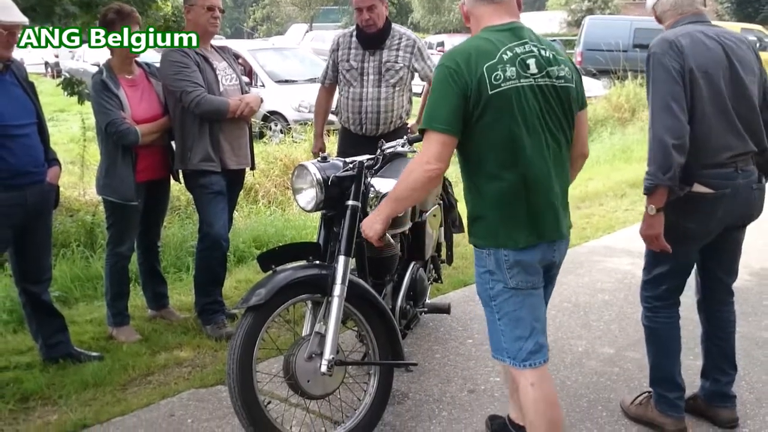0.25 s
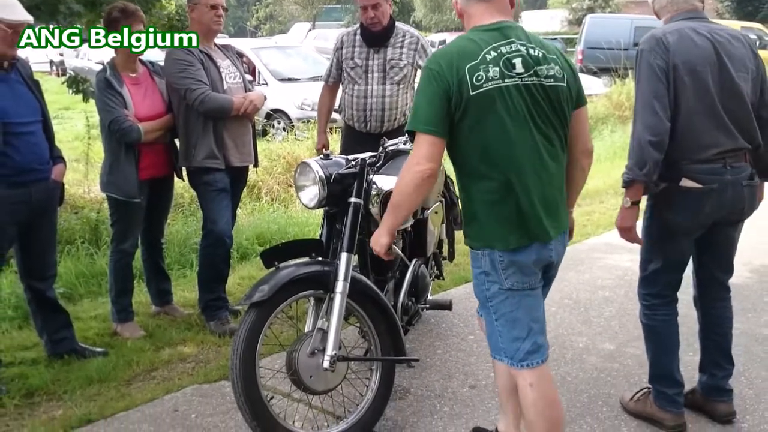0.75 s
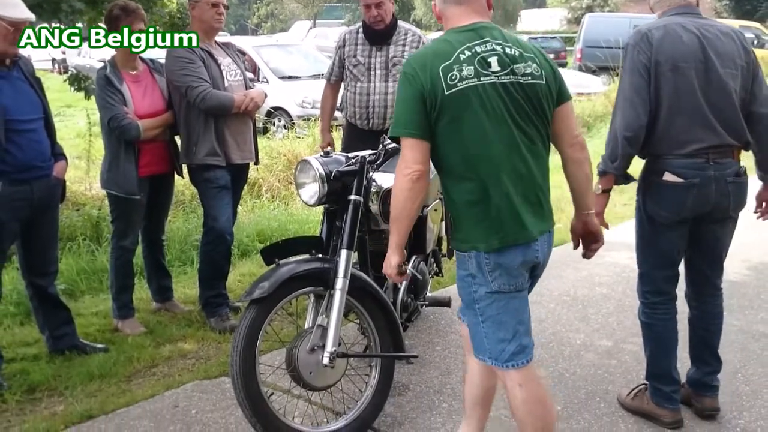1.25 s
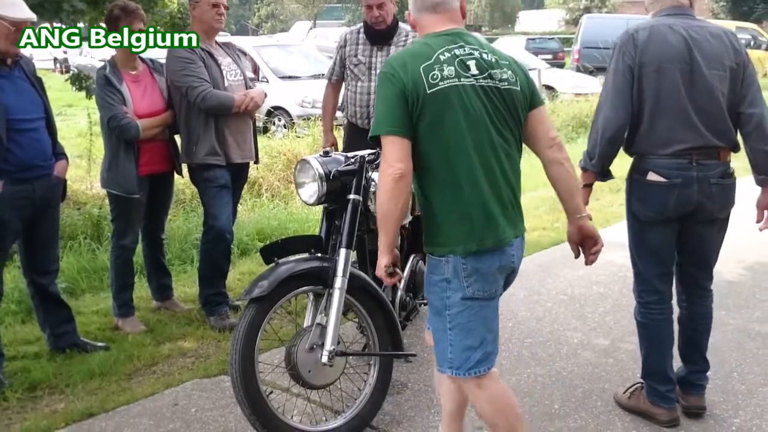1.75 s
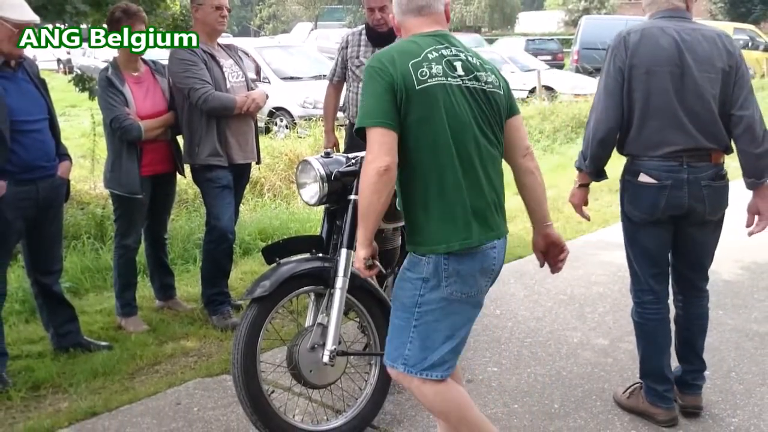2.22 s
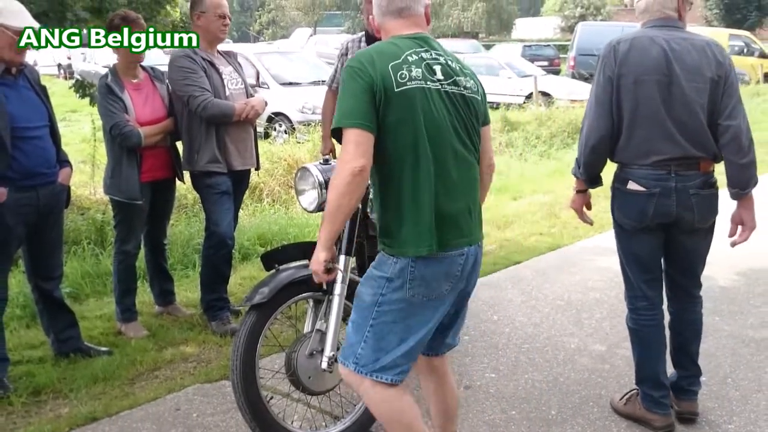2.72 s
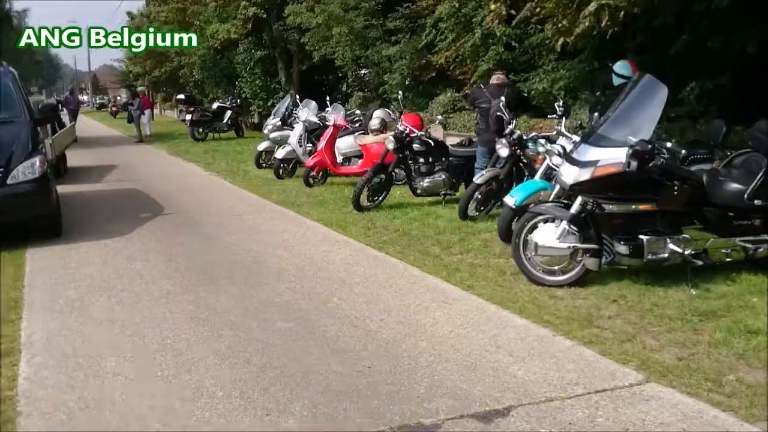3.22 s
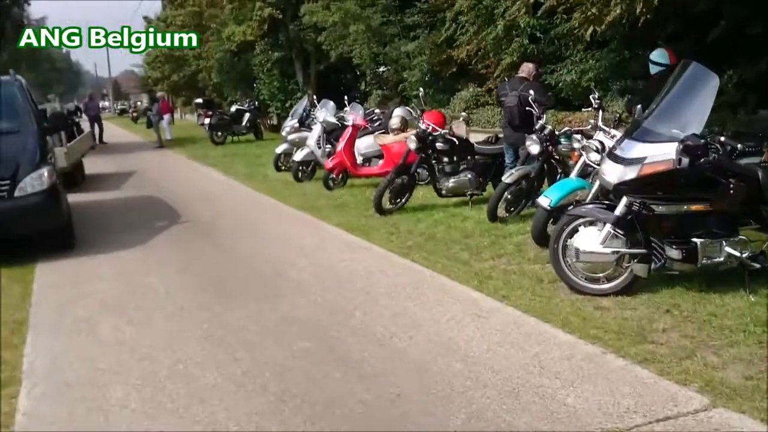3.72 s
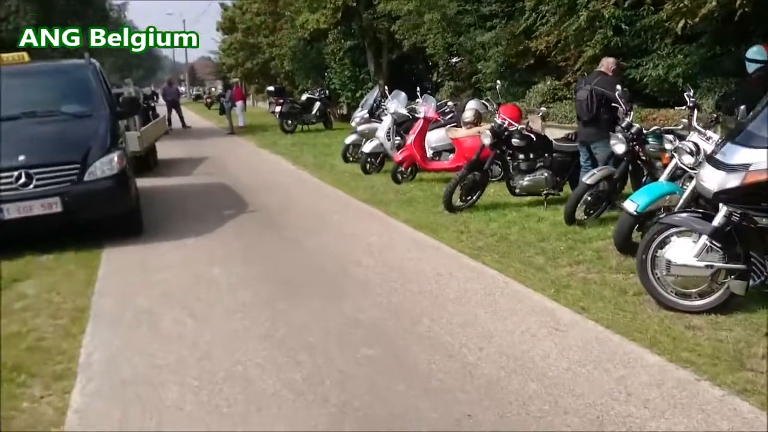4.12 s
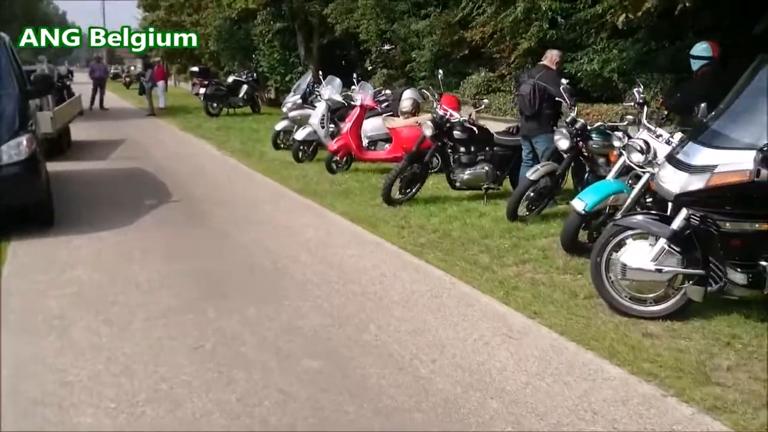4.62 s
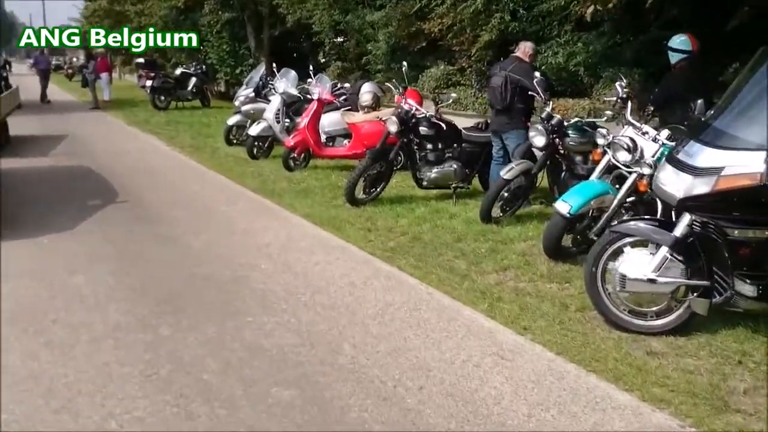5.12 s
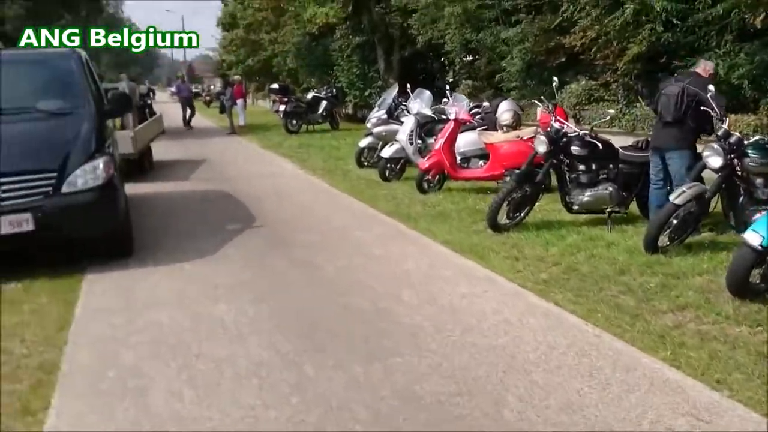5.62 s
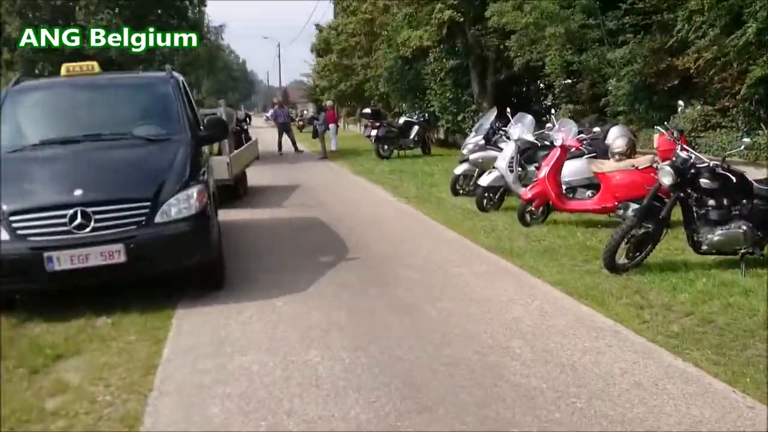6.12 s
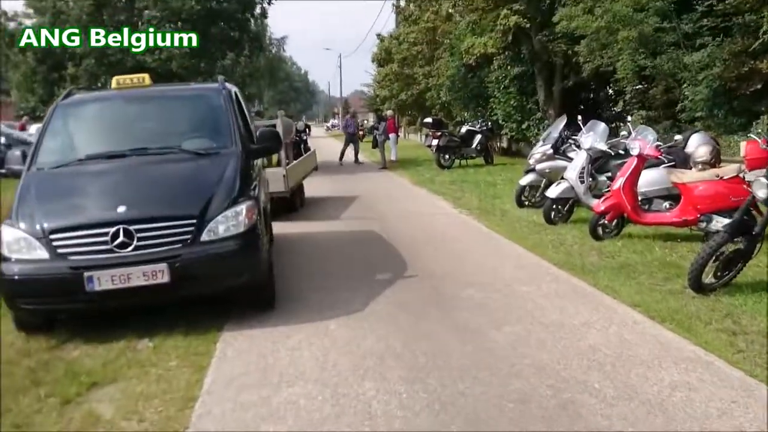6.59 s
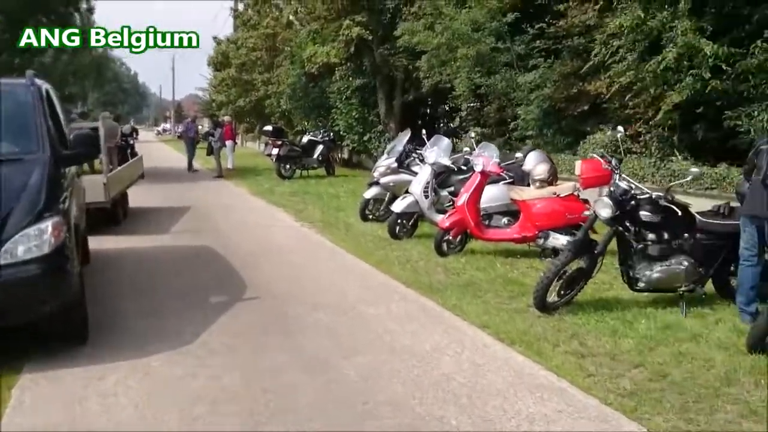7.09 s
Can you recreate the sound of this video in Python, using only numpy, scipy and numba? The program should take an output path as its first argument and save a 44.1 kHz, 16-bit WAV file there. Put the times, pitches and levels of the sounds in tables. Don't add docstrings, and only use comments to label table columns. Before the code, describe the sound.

Close outdoors, an old twin-cylinder motorcycle falls back from a rev, booming and hissing with ringing exhaust pops, while a single thumps slowly beside it. The twin then barks under load and pulls away. A brief fading idle leads to silence. A quiet lane fades in with far engine hum, leaves, wind puffs mainly on the right microphone and small scuffs, ending in a hard knock on the camera.

```python
import sys
import numpy as np
from scipy import signal
from scipy.fft import rfft, irfft
from scipy.io import wavfile
from scipy.ndimage import uniform_filter1d
from numba import njit

SR = 44100
rng = np.random.default_rng(int(sys.argv[2]) if len(sys.argv) > 2 else 0)


def materialize(psi):
    bounded = np.clip(np.atleast_2d(psi).T, -1, 1)
    quanta = np.round(bounded * 32767).astype(np.int16)
    wavfile.write(sys.argv[1], SR, quanta)


def ratio(d):
    e = np.asarray(d, float) / 20
    return 10 ** e


N = 324135
T = np.arange(N) / SR

# t/s, firing f/Hz, second-order boom level/dB
TWIN_OVERRUN = [(0, 56.55, -6.5), (.29, 54.07, -6.5), (.484, 52, -10.5), (.7, 49.2, -9.5),
                (.76, 49.07, -15), (.85, 48.88, -14.5), (1.05, 48.4, -20), (1.23, 45.27, -26.5),
                (1.45, 44.25, -25)]


def twin_turn():
    return 2 * np.pi * np.cumsum(curves(TWIN_OVERRUN)[0]) / SR


# multiple, level under the second order/dB
BOOM_ORDERS = [(.5, -22), (1.5, -12.5), (2.5, -14.5), (3.5, -21.5), (4, -21.5)]
# t/s, peak level/dB, ring f/Hz, ring level/dB
POPS = [
    (0.204, -13.5, 436, -36),
    (0.391, -19, 420, -33),
    (.588, -8.5, 580, -12.5),
    (.934, -12, 443, -17),
    (1.125, -11.5, 458.8, -19),
    (1.369, -8.5, 420, -28),
    (1.392, -14, 437.6, -20),
]
# f/Hz, width/Hz, level/dB
POP_PIPE = [(179, 230, -4), (326, 170, -1), (90, 50, -1.5)]


def overrun(turn):
    two_db = curves(TWIN_OVERRUN)[1]
    fall_db = 0.33 * (two_db - two_db[0])
    one_db = -20.5 + fall_db + 3 * walk(14)
    three_db = -24.5 + fall_db + 3 * walk(14)
    orders = [(1, one_db), (2, two_db), (3, three_db)] + [(k, two_db + db) for k, db in BOOM_ORDERS]
    boom = 0
    for k, db in orders:
        boom = boom + np.sqrt(2) * ratio(db + 1.1 * walk(25)) * np.sin(k * turn + 0.61 * walk(30))

    half_turns = np.flatnonzero(np.diff(turn // np.pi)) / SR
    chance = rng.standard_normal((len(half_turns), 2))
    weak_clicks = pulses(half_turns + .0015 * chance[:, 0], 5.1 * chance[:, 1])
    uneven = ring(soften(weak_clicks, 0.67), POP_PIPE)
    uneven_gain = ratio(-23 + fall_db + 1.5 * walk(9.1))
    steady = boom + uneven_gain * uneven / uneven.std()
    return steady * between(-1, 1.46, edge=0.044) + late_pops()


def late_pops():
    pops = 0
    for s, db, ring_hz, ring_db in POPS:
        modes = [(f, w, g + db + 3.0) for f, w, g in POP_PIPE] + [(ring_hz, 70, ring_db + 4.5)]
        pops = pops + ring(-soften(pulses([s], 0), 0.19), modes)
    s, db = np.transpose(POPS)[:2]
    gas_colour = [(300, 0), (1500, -11.5), (3000, -10.5), (8000, -15.5)]
    return pops + puff(pulses(s, db - 17.0), 0.88, 5.4) * noise(gas_colour)


# t/s, how far it has gone/0-1
PULL_AWAY = [(1.46, 0.03), (1.6, 0.06), (2.0, 0.37), (2.35, 0.5), (2.6, 0.7), (2.76, 1)]
# t/s, firing f/Hz
PULL_REVS = [(1.44, 44.65), (1.62, 47.46), (2.0, 49.21), (2.76, 58.02)]
# f/Hz, width/Hz, level/dB
TWIN_PIPE = [(136.4, 18, 2), (91.1, 32, -1), (197.3, 31, -3)]
# first f/Hz, last f/Hz
SILENCER_GLIDES = [(420, 560), (870, 960), (990, 1130), (1290, 1410)]
# width/Hz, level/dB
SILENCER_RINGS = [(87.6, -5.5), (70.7, -8), (70, -8.5), (93, -24.5)]
# f/Hz, width/Hz, level/dB
VALVE_MODES = [(5300, 500, -2), (6120, 570, -2.5), (2680, 440, -5)]
# t/s, level/dB
RUMBLE = [(0, -38), (.7, -19), (2.0, -29), (2.5, -43)]


def pull_away():
    away = curves(PULL_AWAY)[0]
    # the gas rasp drops fastest, the deep boom next, the silencer ring least; levels in dB, the
    # road echo lag in ms
    layers = (-9.5, -18), (-11.5, -26), (-17, -20), (-32.5, -51), (2.5, 2.96)
    bark_db, boom_db, ring_db, rasp_db, echo_ms = (near + (far - near) * away for near, far in layers)
    hump = np.interp(away, [0.34, 1], [1.0, 0.19])
    span = (1.4612, 2.755)
    clicks = firings(span, PULL_REVS, .00025, 1.5)

    gas = soften(clicks, .15) + .035 * puff(clicks, 1.5, 11.0) * rng.standard_normal(N)
    silencer = 0
    for k, (hz, (width, db)) in enumerate(zip(SILENCER_GLIDES, SILENCER_RINGS)):
        gain = (-1) ** k * ratio(db) * SR / (2 * np.pi * width)
        silencer = silencer + gain * glide(gas, np.interp(T, span, hz), 1. * width)
    boom = ring(soften(clicks, 2.4), TWIN_PIPE)

    direct = ratio(bark_db) * bark(clicks, dip_ms=0.72, hump_ms=1.265, hump=hump)
    road = 0.37 * np.interp(T - echo_ms / 1000, T, direct)

    uneven = clicks * ratio(3.2 * walk(40))
    rasp_colour = [(400, -2.0), (1000, -0.5), (2500, -14.5), (5000, -6.5), (9000, -14.5), (15500, -19.5)]
    rasp = ratio(rasp_db + 3.5) * puff(uneven, 0.812, 4.0) * noise(rasp_colour)
    valve_clicks = np.roll(clicks * ratio(4.0 * walk(50)), int(0.0018 * SR))
    valves = ratio(bark_db - 24) * ring(valve_clicks, VALVE_MODES)
    rumble_colour = [(15, -14.5), (40, -3.5), (90, -2.5), (200, -13.0)]
    rumble = ratio(curves(RUMBLE)[0] + 2.0 * walk(10)) * noise(rumble_colour)
    return direct + road - ratio(ring_db) * silencer - ratio(boom_db) * boom + rasp + rumble + valves


# t/s, thump level/dB, pipe facing the camera/0-1
SINGLE_IDLE = [
    (.27, -42.5, 0.9),
    (.55, -13.5, 0),
    (1.05, -16, 0.24),
    (1.25, -10, 0.5),
    (1.45, -14, 0.76),
    (2.1, -18, 0.23),
    (2.75, -23.5, 0.07),
]
# t/s, firing f/Hz
SINGLE_REVS = [(.27, 16.34), (1.0, 16.22), (1.8, 17.82), (2.76, 19.46)]
# t/s, f/Hz
SINGLE_RING = [(.3, 520), (1.3, 530), (1.45, 660), (2.75, 680)]
# f/Hz, width/Hz, level/dB
SINGLE_PIPE = [(973, 51, -8), (1330, 150, -7), (271, 68, -2.5), (45.36, 26, -8.5)]


def single():
    thump_db, facing = curves(SINGLE_IDLE)
    crack_db = thump_db - 18 + 7.5 * facing
    clicks = firings((.2772, 2.75), SINGLE_REVS, .0004, 1.8)
    push = soften(clicks, .2)
    main = ratio(2.0) * SR / (2 * np.pi * 130) * glide(push, curves(SINGLE_RING)[0], 110.0)
    thump = 0.77 * bark(clicks, dip_ms=0.95, hump_ms=1.63, hump=0.48)
    knock = thump - main + ring(push, SINGLE_PIPE)
    crack_colour = [(500, 0.5), (1200, -2), (2500, -2), (5000, -8.5), (9000, -7.5), (15500, -19.0)]
    crack = puff(clicks, 0.69, 4.5) * noise(crack_colour)
    return ratio(thump_db) * knock + ratio(crack_db + 2.5) * crack


# t/s, level/dB
HISS = [(0, -14.5), (.07, -18.5), (.4, -25.5), (.77, -29), (1.15, -36.5), (1.5, -37), (2.2, -46),
        (2.6, -46), (2.75, -52)]
# f/Hz, level/dB
HISS_COLOUR = [(1500, -15), (2100, -4), (2800, -1.5), (3600, -5), (5000, -6.5), (7000, -9.5), (9000, -18.5)]


def hiss(turn):
    main_db = curves(HISS)[0]
    low_db = -8.5 + 0.64 * main_db
    top_db = -18.5 + .92 * main_db
    gate = 1 + 0.19 * np.sin(turn) * between(-1, 0.96, edge=0.9)
    low_colour = [(250, -8.5), (550, -3.5), (1100, -4), (1600, -9), (2200, -18.0)]
    top_colour = [(7000, -13.5), (9000, -5.5), (12000, -9.0), (15600, -14)]
    main = ratio(main_db - 4.0 + 1.1 * walk(40)) * noise(HISS_COLOUR)
    low = ratio(low_db - 5.0 + 2.0 * walk(30)) * noise(low_colour)
    top = ratio(top_db + 1.5 * walk(40)) * noise(top_colour)

    intake_hz = 930 + (1600 - 930) * np.exp(-np.maximum(T - 0.13, 0) / 0.3)
    intake_db = -24.5 - 26 * np.abs(T - 0.36)
    gear_hz = 2750 + 500 * T
    gear_db = -26 - 40.5 * np.maximum(T - 0.2, 0)
    breath = rng.standard_normal((3, N))
    intake = ratio(intake_db + 21.5) * glide(breath[0], intake_hz, 65.0)
    gear = ratio(gear_db + 14.0) * glide(breath[1], gear_hz, 199.6)
    wavering = ratio(main_db + 12.0) * glide(breath[2], 1570 + 30 * walk(6), 110.)
    whistles = (intake + wavering + gear) * between(-1, 1.1)
    return gate * (main + low + top + whistles) * between(-1, 2.758)


# t/s, peak level/dB
THUDS = [
    (2.754, -31),
    (2.786, -36),
    (2.835, -27),
    (2.873, -30),
    (2.922, -30.5),
    (2.956, -35.5),
    (3.005, -33),
    (3.042, -38.5),
    (3.092, -43),
]
# f/Hz, width/Hz, level/dB
THUD_PIPE = [(174, 24, 2.5), (67, 24, 3.5), (138, 25, -9), (970, 110, -6.5)]
# t/s, peak level/dB
TICKS = [
    (2.833, -42),
    (2.8844, -49),
    (2.9402, -52),
    (2.9934, -49),
    (3.0494, -59),
    (3.096, -59),
]


def slow_idle():
    s, db = np.transpose(THUDS)
    thuds = -ring(soften(pulses(s, db - 1.5), 0.5), THUD_PIPE)
    tick_colour = [(1200, -5), (2200, 7), (5000, -18.0), (9000, -16)]
    ticks = puff(pulses(*np.transpose(TICKS)), 0.27, 3.6) * ratio(-0.5) * noise(tick_colour)
    rumble_db = np.interp(T, [2.75, 2.9, 3.1], [-28, -38, -58])
    rumble = ratio(rumble_db) * noise([(4, -1), (12, -13), (30, -12.0), (260, -22.0), (340, -50.0)])
    air_db = np.interp(T, [2.75, 2.95, 3.11], [-54, -60, -76])
    air_colour = [(300, 4.5), (1000, -1.5), (2500, -2.5), (4000, -12.0), (6000, -18.0), (15500, -28.0)]
    air = ratio(air_db) * noise(air_colour)
    return (thuds + ticks + rumble + air) * between(2.752, 3.11)


# t/s, peak level/dB, f/Hz, width/Hz, left minus right/dB
KNOCKS = [
    (7.165, -26.5, 150, 200, -16),
    (7.201, -36, 150, 199, -8),
    (7.234, -16.5, 248, 500, -10),
    (7.2625, -33.5, 5740, 1500, -5.5),
    (7.2665, -5, 1876, 1371, 17.5),
    (7.267, -25.5, 4020, 150, 7.5),
    (7.268, -22.5, 8700, 7840, 12.5),
    (7.29, -31.5, 890, 900, 0.5),
    (7.2977, -17, 1400, 900, 19),
    (7.348, -22.5, 800, 1513, 1),
]


def camera_knocks():
    knocks = 0
    for s, db, hz, width, pan in KNOCKS:
        contact = np.sign(400 - hz) * soften(pulses([s], db), 120 / hz)
        knocks = knocks + np.outer(ratio([pan / 2, -pan / 2]), ring(contact, [(hz, width, 0)]))
    rub = puff(pulses([7.266, 7.292], [-33, -34]), 1.8, 13.0) + ratio(-40) * between(7.26, 7.4, edge=0.02)
    scrape_colour = [(60, 13.0), (300, 4), (1500, -4.5), (4000, -13.5), (15600, -22)]
    return knocks + rub * ratio(2.0 * walk(200)) * noise(scrape_colour)


# t/s, peak level/dB, f/Hz, left minus right/dB
TAPS = [
    (4.516, -31.5, 970, -2),
    (5.121, -38, 1510, -2),
    (5.146, -31, 720, 3),
    (5.696, -30, 626, 6),
    (5.753, -28, 920, -1),
    (6.325, -32, 891, 0),
    (6.645, -36, 1250, -4),
    (7.059, -28.5, 705, -1),
]


def far_steps():
    steps = 0
    for s, db, hz, pan in TAPS:
        scuff = puff(pulses([s - .002], db - 7.0), 1.4, 10.0)
        colour = [(hz / 2.0, -15), (hz, 0), (2.02 * hz, -12)]
        steps = steps + ratio([[pan / 2], [-pan / 2]]) * scuff * noise(colour)
    return steps


# t/s, level under full/dB
FADE_IN = [(3.78, -49), (3.84, -35), (4.1, -12.5), (4.28, -4), (4.5, 0)]
# f/Hz, level per Hz/dB
AIR = [(15, -46.5), (25, 2.5), (66, -10), (470, -26), (1300, -28), (2560, -33.5), (5200, -49.5),
       (15500, -74)]
# f/Hz, width/Hz, level/dB
LEAVES = [(639, 90, -3), (852, 170, 4), (1367, 130, 1.5), (1680, 70, -12), (2540, 190, -0.5),
          (3254, 110, -8), (3583, 67, -11.5), (4300, 260, -31), (5680, 140, -17.5)]
# f/Hz, level/dB
RUSTLE_COLOUR = [(2500, -11), (3800, -3.5), (5000, -3.5), (7000, -8), (10000, -15), (15500, -15.5)]
# t/s, length/s, level/dB
RUSTLES = [
    (4.16, 0.087, -45.5),
    (4.3, 0.12, -44),
    (5.16, 0.067, -57),
    (5.33, .06, -50.5),
    (6.06, 0.17, -52),
    (7.21, 0.042, -63),
]
# multiple, level/dB
HUM_ORDERS = [(1, -11), (2, 1.5), (3, -2), (4, -8.5), (5, -9.5), (6, -24), (7, -17.5)]


def lane():
    fade_db = curves(FADE_IN)[0]
    air_db = -47 + fade_db + 0.92 * walk(4)
    hum_db = -42 + fade_db + 0.97 * walk(12)
    air = ratio(air_db + 5.5 + 1.0 * walk(11)) * noise(AIR)
    leaves = 0
    for hz, width, db in LEAVES:
        colour = [(hz - 2 * width, -18), (hz, 0), (hz + 2 * width, -18)]
        leaves = leaves + ratio(db + 1.83 * walk(7.8)) * noise(colour)
    flutter = ratio(fade_db - 8.5 + 1.6 * walk(90))
    rustle = (ratio(-54.5) + swells(RUSTLES)) * flutter * noise(RUSTLE_COLOUR)
    turn = 2 * np.pi * 24.35 * np.cumsum(1 + .012 * walk(2.5)) / SR
    hum = sum(ratio(db + 2.7 * walk(6.1)) * np.sin(k * turn + 1.3 * k * k) for k, db in HUM_ORDERS)
    return (air + ratio(air_db - 12) * leaves + rustle + ratio(hum_db - 0.5) * hum) * between(3.78, 9, edge=.05)


# t/s, length/s, level/dB
GUSTS = [
    (4.07, .04, -30),
    (4.25, .06, -36),
    (4.75, .15, -30.5),
    (5.32, .1, -31.5),
    (5.5, .1, -33.5),
    (5.76, .08, -30),
    (6.0, .06, -27),
    (6.28, .04, -33),
    (6.56, .12, -23.5),
    (7.18, .08, -28.5),
]


def port_wind():
    colour = [(2, -19), (5, -11.5), (9, -0.5), (14, -9.5), (30, -32.5), (100, -39.0)]
    gusts = noise(colour, alike_hz=1.5)
    level = (ratio(-38.5) + swells(GUSTS)) * ratio(curves(FADE_IN)[0] / 2 + 6.0)
    sway = ring(-soften(pulses([7.272], -3.0), 9.0), [(20, 9, -1)])
    return (level * gusts * between(3.75, 9, edge=0.26) + sway) * ratio([[-20], [0]])


# f/Hz, width/Hz, level/dB
LEFT_PORT = [(750, 760, -1.5), (1990, 800, 1.5), (3519, 1100, 3)]
RIGHT_PORT = [(1516, 320, 7.1), (5834, 670, 16.5)]
# t/s, lag/ms
RIGHT_LAG = [(0, 0.36), (1.2, 0.25), (1.6, 0.11), (2.75, 0.035), (2.76, 0.234), (7.35, 0.19)]


def ports(air):
    out = air.copy()
    for side, port in enumerate((LEFT_PORT, RIGHT_PORT)):
        for hz, width, db in port:
            out[side] += (ratio(db) - 1) * signal.lfilter(*signal.iirpeak(hz, hz / width, SR), air[side])
    left = signal.lfilter(*signal.butter(1, 75, "high", fs=SR), out[0])
    right = np.interp(T - curves(RIGHT_LAG)[0] / 1000, T, out[1])
    return np.array([left, right])


def curves(table):
    s, *columns = np.transpose(table)
    return [np.interp(T, s, c) for c in columns]


def between(t0, t1, edge=0.0059):
    return np.clip(np.minimum(T - t0, t1 - T) / edge, 0, 1)


def swells(events):
    return sum(ratio(db) * np.exp(-((T - s) / length) ** 2) for s, length, db in events)


def walk(rate):
    k = int(SR / rate)
    held = np.repeat(rng.standard_normal(N // k + 1), k)
    return 1.3 * uniform_filter1d(uniform_filter1d(held, k), k)[:N]


def pulses(times, db):
    out = np.zeros(N)
    np.add.at(out, np.clip((np.asarray(times) * SR).astype(int), 0, N - 1), ratio(db))
    return out


def firings(span, rate, jitter_s, scatter_db):
    n = np.cumsum(curves(rate)[0]) / SR
    first, last = np.interp(span, T, n)
    whole = np.arange(first, last)
    chance = rng.standard_normal((len(whole), 2))
    return pulses(np.interp(whole, n, T) + jitter_s * chance[:, 0], scatter_db * chance[:, 1])


def soften(clicks, ms):
    size = max(int(ms * SR / 1000), 1)
    return uniform_filter1d(uniform_filter1d(clicks, size), size)


def puff(clicks, rise_ms, fall_ms):
    t = np.arange(2000) / SR * 1000
    return signal.fftconvolve(clicks, np.exp(-t / fall_ms) * (1 - np.exp(-t / rise_ms)))[:N]


def bark(clicks, dip_ms, hump_ms, hump):
    t = np.arange(-200, 600) / SR * 1000
    hump_shape = np.exp(-((t - dip_ms - 1.53 * hump_ms) / hump_ms) ** 2)
    dip_shape = np.exp(-(t / dip_ms) ** 2)
    push = signal.fftconvolve(clicks, hump_shape)[200:N + 200]
    dip = signal.fftconvolve(clicks, dip_shape)[200:N + 200]
    return hump * push - dip


def ring(x, modes):
    out = 0
    for k, (hz, width, db) in enumerate(modes):
        gain = (-1) ** k * ratio(db) * SR / (2 * np.pi * width)
        out = out + gain * signal.lfilter(*signal.iirpeak(hz, hz / width, SR), x)
    return out


@njit
def glide(x, hz, width):
    y, b, l = np.empty(len(x)), 0., 0.
    for i in range(len(x)):
        g, k = np.tan(np.pi * hz[i] / SR), width / hz[i]
        v = (b + g * (x[i] - l)) / (1 + g * (g + k))
        b, l, y[i] = 2 * v - b, l + 2 * g * v, k * v
    return y


def noise(colour, alike_hz=1600):
    hz = np.arange(N // 2 + 1) * SR / N + 1e-3
    f, db = np.transpose(colour)
    alike = 1 / (1 + (hz / alike_hz) ** 2)
    mid, side = rfft(rng.standard_normal((2, N)))
    pair = np.sqrt(1 + .8 * alike) * mid + np.sqrt(1 - 0.9 * alike) * side * np.array([[1], [-1]])
    out = irfft(pair * ratio(np.interp(np.log(hz), np.log(f), db, -90, -90)), N)
    return out / out.std()


def scene():
    turn = twin_turn()
    near = (pull_away() + single()) * between(-1, 2.758)
    bikes = overrun(turn) + near + hiss(turn) + slow_idle()
    quiet = camera_knocks() + far_steps() + lane()
    return ports(bikes * ratio([[.1], [-.1]]) + quiet * ratio([[-.6], [.6]])) + port_wind()


def band_limit(x):
    return signal.sosfilt(signal.butter(12, 15730, fs=SR, output="sos"), x)


def record(dry):
    peak = 1.03
    return band_limit(1.069 * peak * np.tanh(dry / peak))


dry = scene()
out = record(dry)
materialize(out)
```